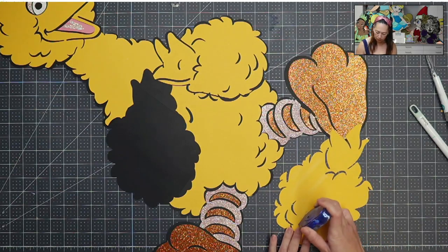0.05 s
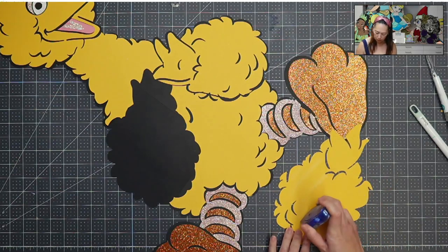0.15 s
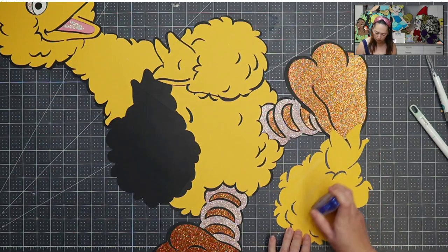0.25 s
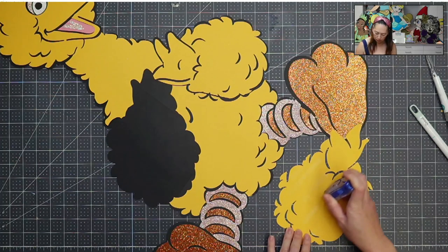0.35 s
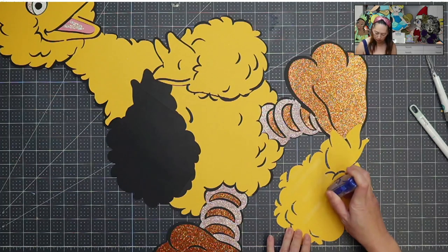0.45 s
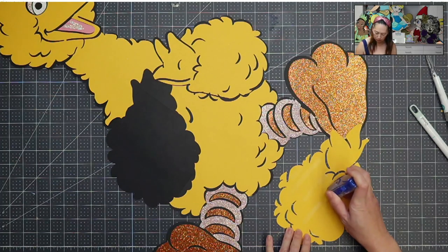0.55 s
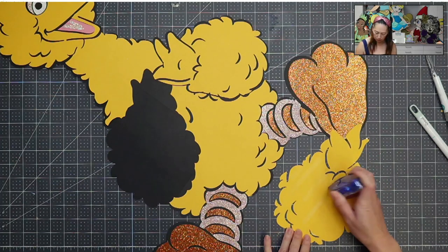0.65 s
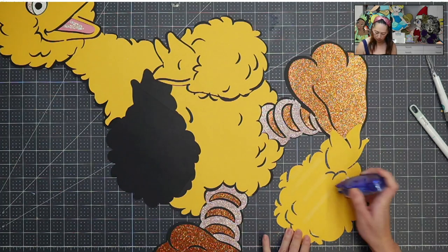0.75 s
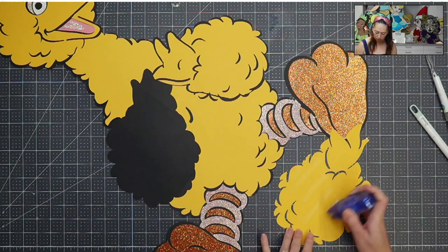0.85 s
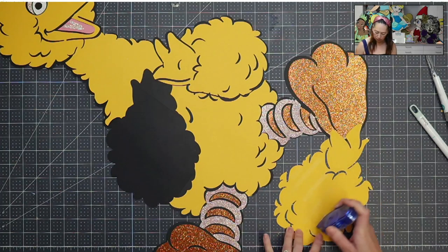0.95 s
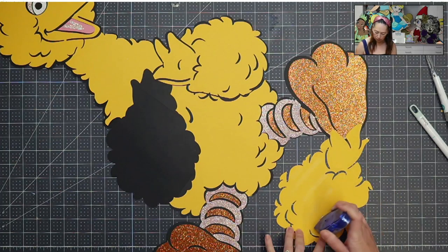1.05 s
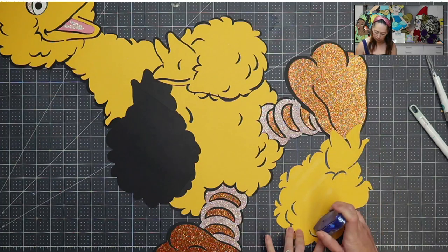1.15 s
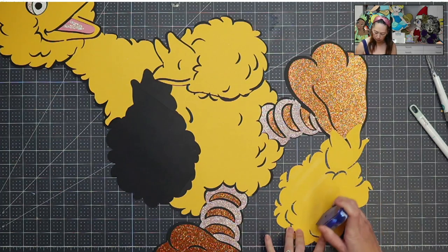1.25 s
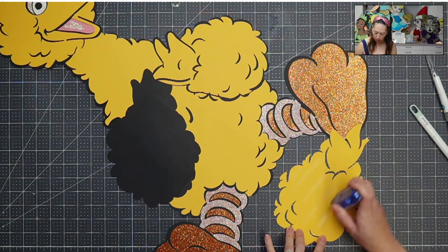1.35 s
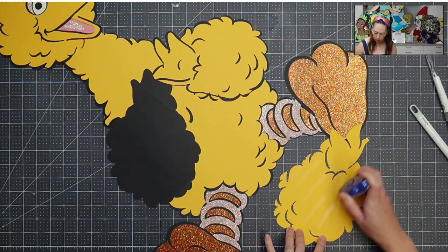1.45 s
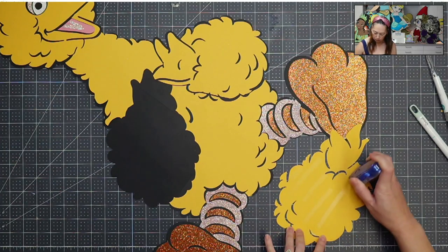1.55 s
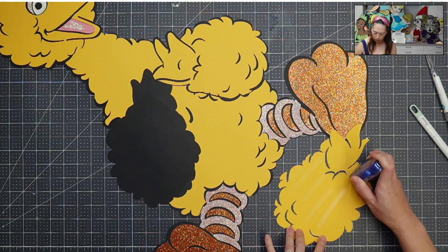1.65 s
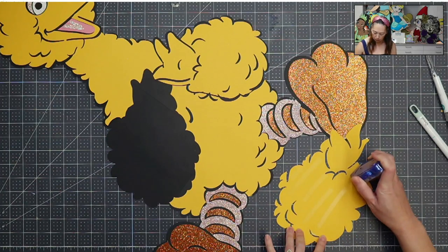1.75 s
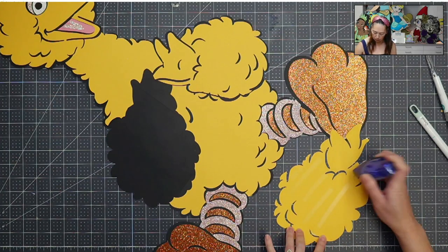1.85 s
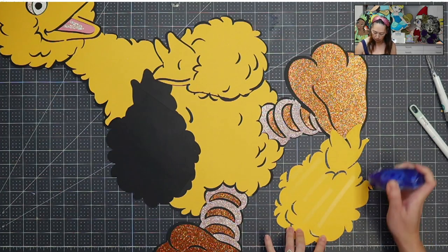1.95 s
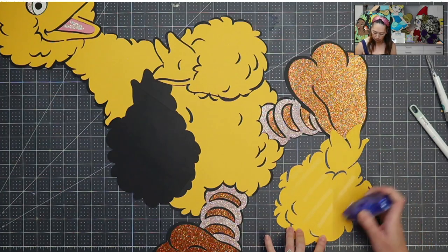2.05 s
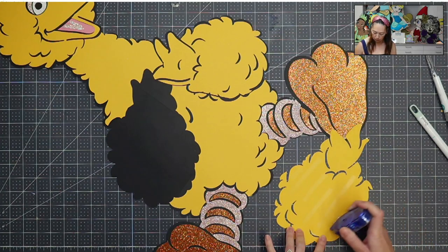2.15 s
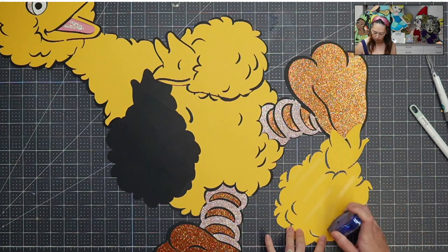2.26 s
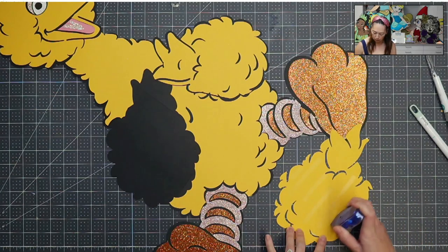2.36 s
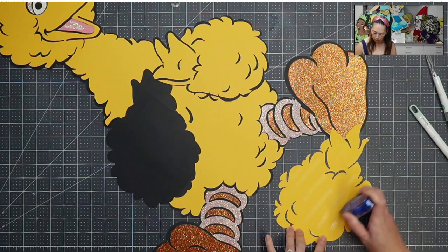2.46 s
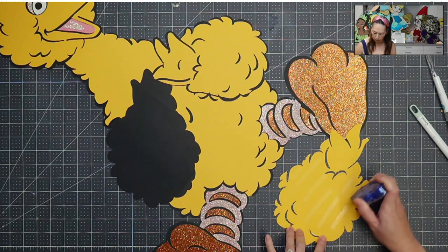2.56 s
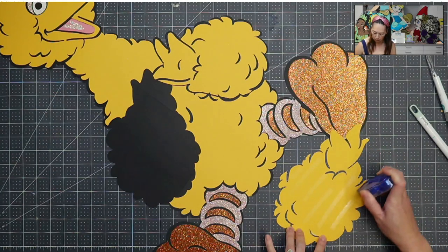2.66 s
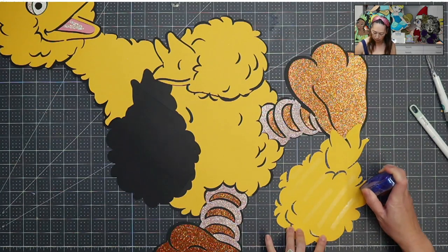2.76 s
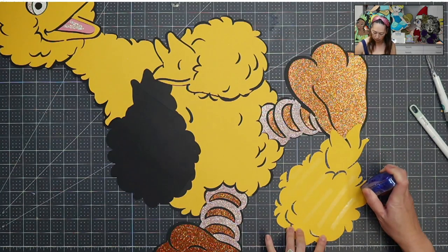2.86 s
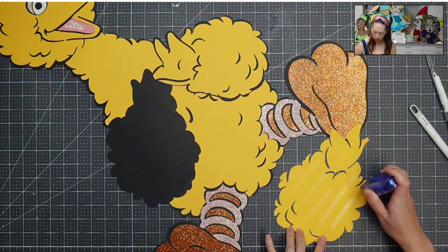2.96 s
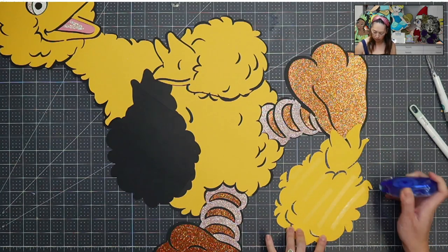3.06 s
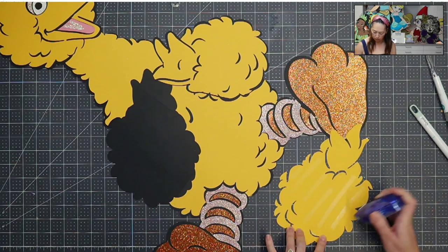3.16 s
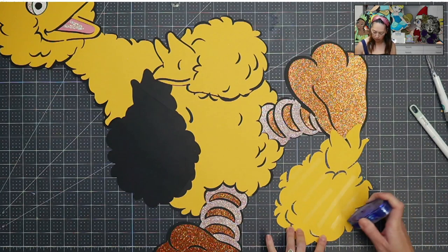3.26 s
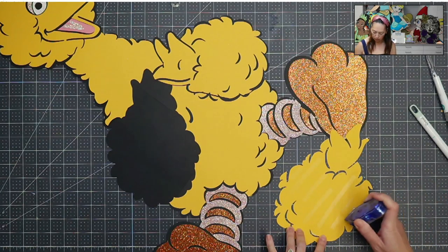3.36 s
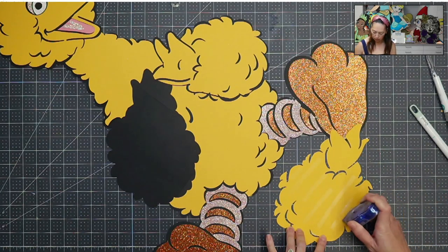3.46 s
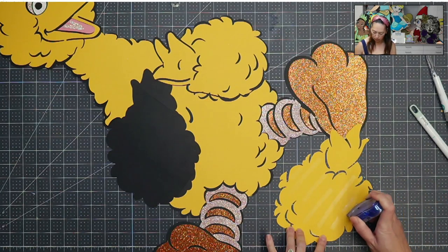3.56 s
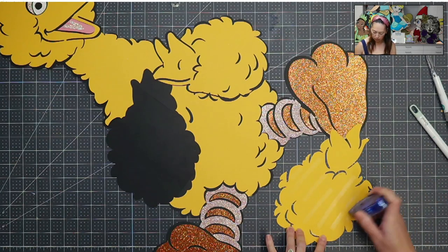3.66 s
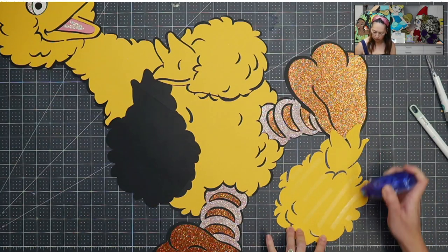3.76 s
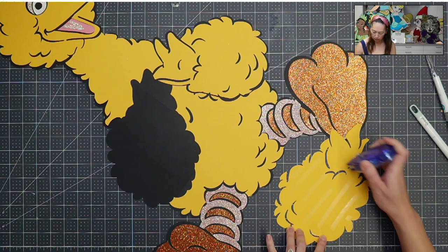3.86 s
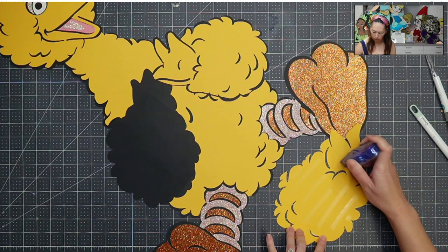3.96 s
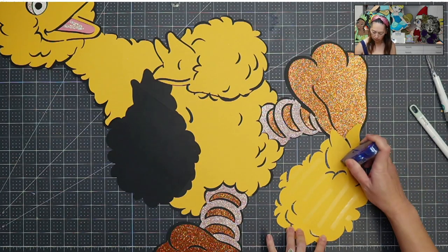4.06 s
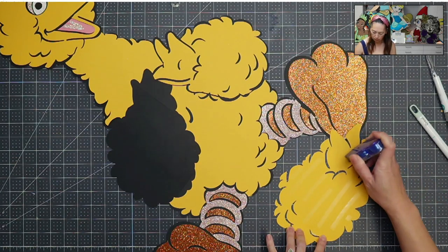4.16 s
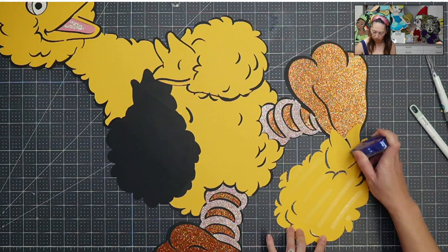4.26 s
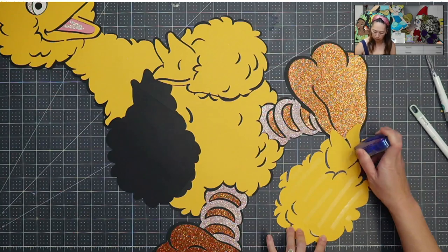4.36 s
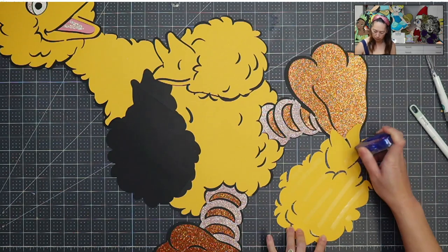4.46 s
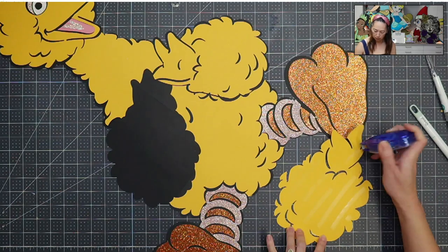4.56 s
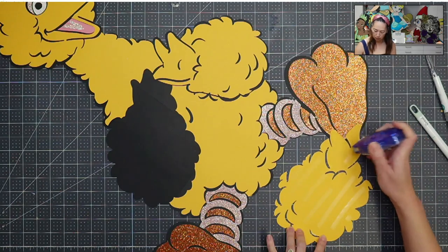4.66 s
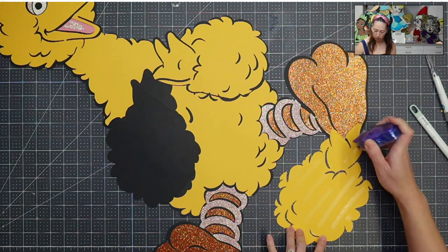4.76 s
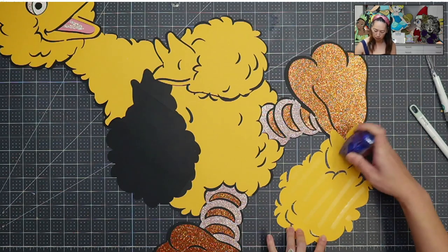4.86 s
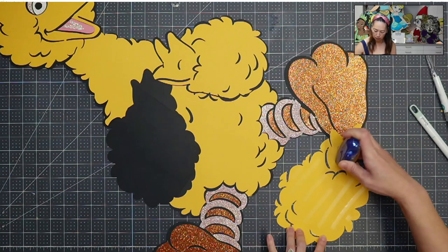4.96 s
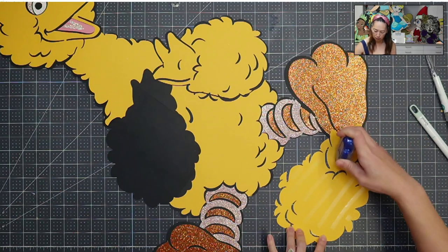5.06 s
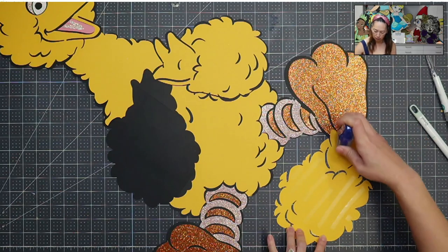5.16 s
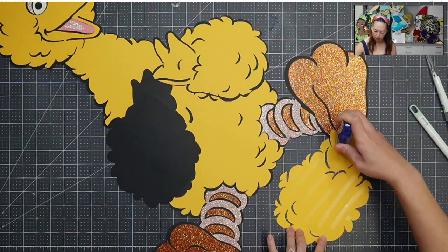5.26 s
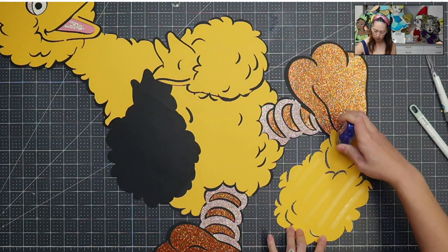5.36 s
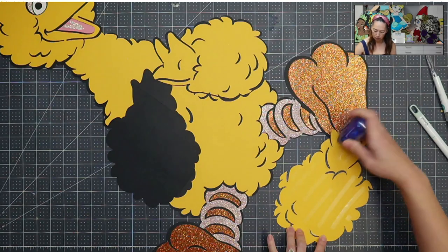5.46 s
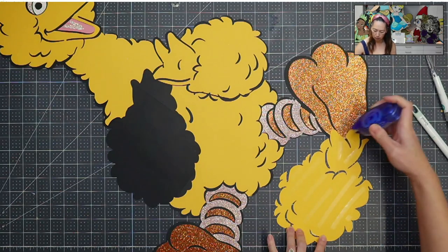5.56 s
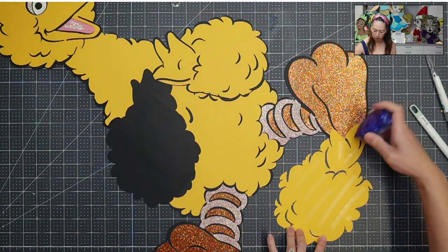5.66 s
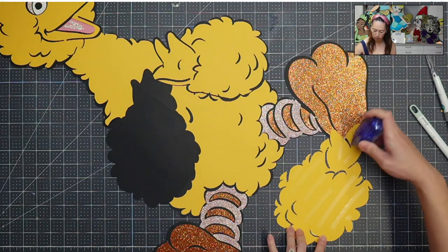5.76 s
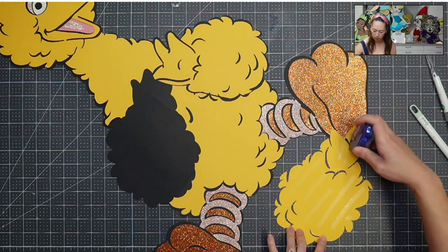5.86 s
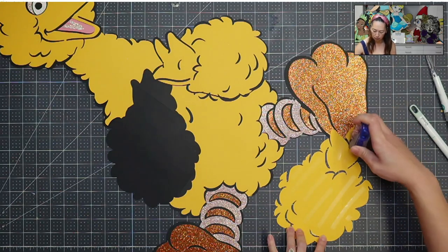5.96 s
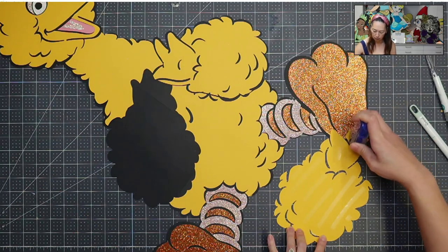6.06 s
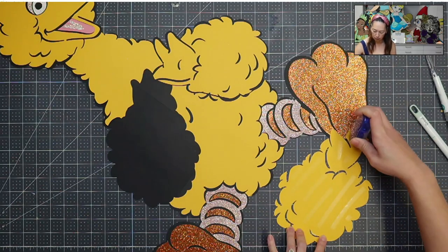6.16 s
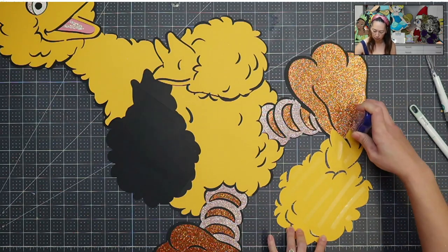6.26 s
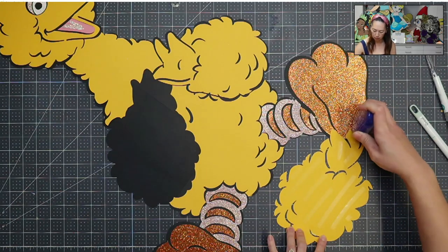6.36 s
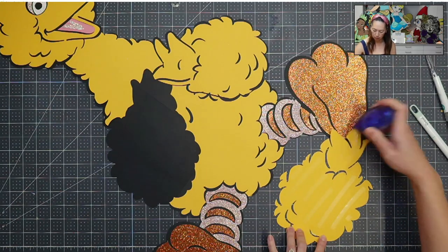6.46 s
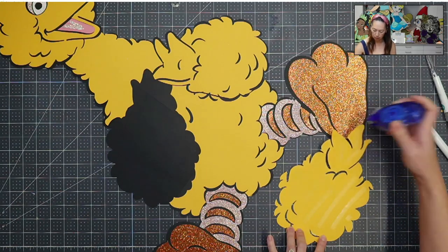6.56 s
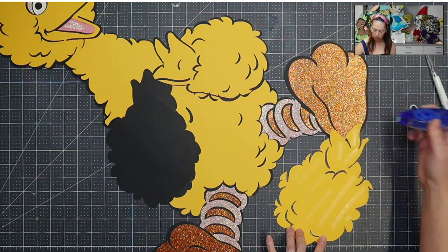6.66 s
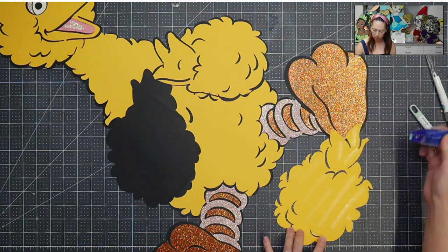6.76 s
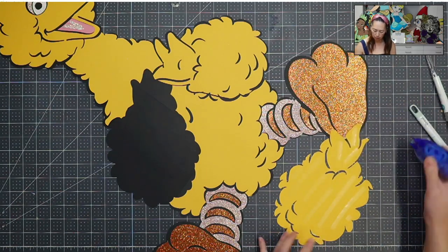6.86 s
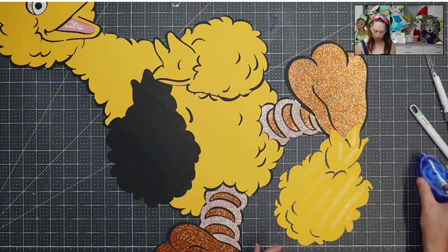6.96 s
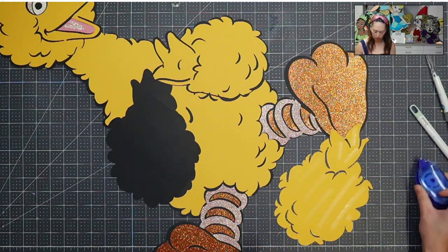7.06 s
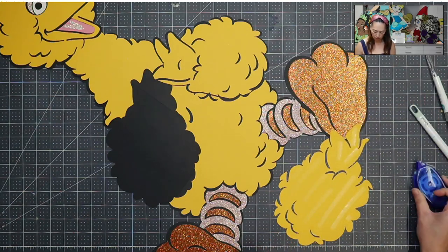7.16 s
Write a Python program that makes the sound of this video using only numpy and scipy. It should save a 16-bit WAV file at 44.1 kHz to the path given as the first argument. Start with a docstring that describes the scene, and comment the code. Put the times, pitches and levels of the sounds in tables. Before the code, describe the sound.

A plastic tape runner is drawn over cardstock in eight short strokes, close to the microphone. Its ratchet buzzes when pulled fast and separates into clicks as it slows. The first three strokes come at the very start, at 1 second and at 2.1 seconds, each about a third of a second long. Mostly shorter, clickier pulls follow at 3.3, 3.9, 4.9, 5.8 and 6 seconds. The tip lands with a soft thump and a plastic knock at about 0.9, 2, 3.2, 3.8 and 5.7 seconds. The tape catches with hard snaps near 1.2, 2.3 and 5 seconds, and small dry ticks of the case fall between strokes. From 6.8 to 7 seconds the runner is put down on the table with a few quick bumps, the last the loudest. A small room rings lightly behind it, over faint low rumble and thin hiss.

```python
"""Tape runner on a craft table

A plastic tape runner is drawn over cardstock in eight short strokes, close to the microphone.
Its spool ratchet clicks tooth by tooth: a buzz in fast strokes, single clicks in slow ones.
It lands with a soft thump and a knock before five of the strokes, ticks in the hand between them
and is laid aside at the end. A small room rings behind it, over low rumble and thin hiss."""
import sys
import numpy as np
from scipy import signal
from scipy.fft import rfft, irfft
from scipy.io import wavfile

SR = 44100
rng = np.random.default_rng(int(sys.argv[2]) if len(sys.argv) > 2 else 0)


def generate_wav(signal):
    """Clip the signal to [-1, 1] and save it as 16-bit WAV at the path in sys.argv[1]."""
    frames = np.transpose(np.atleast_2d(signal))
    scaled = np.clip(frames, -1, 1) * 32767
    pcm = np.round(scaled).astype(np.int16)
    wavfile.write(sys.argv[1], SR, pcm)


N = 318402
USUAL_TEETH_PER_S, USUAL_FORCE_DB = 100, -12  # an ordinary pull


def amp(db):
    """Decibels to gain."""
    return 10 ** (np.asarray(db) / 20)


def curve_at(points, hz):
    """A table's value at each frequency, joined on a log axis."""
    f, value = np.transpose(points)
    return np.interp(np.log(hz + 1), np.log(f + 1), value)


def resonance_db(modes, hz):
    """Level that a set of resonances adds at each frequency."""
    return sum(db / (1 + (2 * (hz - f) / width) ** 2) for f, width, db in modes)


def unit_energy(x):
    """Scales to an energy of one."""
    return x / np.sqrt(np.sum(x ** 2, axis=-1, keepdims=True) + 1e-20)


def add(mix, s, sound):
    """Adds a sound to the mix at time s."""
    part = mix[max(round(s * SR), 0):][:len(sound)]
    part += sound[:len(part)]


def minimum_phase(db):
    """Spectrum of a filter with this level that rings only after a blow."""
    cepstrum = irfft(np.log(amp(db)))
    half = cepstrum.shape[-1] // 2
    cepstrum[..., 1:half] *= 2
    cepstrum[..., half + 1:] = 0
    return np.exp(rfft(cepstrum))


def snaps(rows, colour, slide_db, rise_s, chatter_s, ring_db, ring_s, alike, size=2048):
    """Each snap is a short slide of plastic, a few milliseconds of chatter and a brief ring."""
    times, energy_db, body_db, treble_db = np.transpose(rows)
    lead_s, slide_s = 0.005, 0.0013
    t, hz = np.arange(size) / SR - lead_s, np.fft.rfftfreq(size, 1 / SR)
    noise = rng.standard_normal((len(times), size))
    grain = signal.lfilter([1], [1, -alike], noise, axis=0)  # each snap resembles the one before
    slide = amp(slide_db) * np.exp(-abs(t) / slide_s)
    after = np.maximum(t, 0)
    rise = 1 - np.exp(-(after / rise_s) ** 2)
    chatter = np.exp(-(after / chatter_s) ** 4)
    ring = amp(ring_db) * np.exp(-after / ring_s)
    contacts = np.sign(grain) * (slide + rise * (chatter + ring))  # tiny contacts of like strength
    # body and treble are weighted shelves: they tilt the colour and leave the energy alone
    low_shelf = body_db[:, None] * curve_at([(1900, 0.66), (2700, 0.082)], hz)
    high_shelf = treble_db[:, None] * curve_at([(5800, 0.058), (8500, 0.89)], hz)
    colour_db = np.array([colour(s, hz) for s in times]) + low_shelf + high_shelf
    sounds = unit_energy(irfft(rfft(contacts) * minimum_phase(colour_db)))
    out = np.zeros(N)
    for s, gain, sound in zip(times, amp(energy_db), sounds):
        add(out, s - lead_s, gain * sound)
    return out


# room tone and microphone hiss: (frequency [Hz], relative level [dB])
AIR_SPECTRUM = [(12, -47), (20, -9), (36, -8), (75, -4), (270, -16.5), (377, -16.5), (446, -21),
                (607, -19.5), (1060, -26), (1150, -24.5), (1480, -25.5), (2600, -28.5), (3160, -31.5),
                (3530, -30), (16000, -35)]
# narrow bands in that noise: (frequency [Hz], width [Hz], boost [dB])
AIR_PEAKS = [(104.5, 11.5, 4.5), (1580, 180, -0.5), (3190, 210, 12)]
# likeness of left and right at the microphone: (frequency [Hz], correlation [0-1])
AIR_CORRELATION = [(60, 0.98), (150, 0.94), (380, 0.86), (950, 0.74), (2380, 0.86), (5980, 0.61),
                   (15000, 1)]


def room_tone(level_db=-65):
    """Steady low room rumble under the microphone's thin hiss."""
    hz = np.fft.rfftfreq(N, 1 / SR)
    colour_db = curve_at(AIR_SPECTRUM, hz) + resonance_db(AIR_PEAKS, hz)
    mid, side = rfft(rng.standard_normal((2, N))) * amp(colour_db)
    likeness = curve_at(AIR_CORRELATION, hz)
    mid, side = mid * np.sqrt(1 + likeness), side * np.sqrt(1 - likeness)
    stereo = irfft(np.array([mid + side, mid - side]), N)
    return amp(level_db) * np.sqrt(N) * unit_energy(stereo)


# a click of the case, heard close up: (frequency [Hz], relative level [dB])
CASE_SPECTRUM = [(210, -62.5), (350, -29), (653, -25), (707, -18.5), (1380, -3), (1520, -5), (2350, -7.5),
                 (3280, -0.5), (4110, -7), (4670, -5), (5220, -7), (8170, -11.5), (10700, -16.5),
                 (14100, -11), (16000, -24)]
# resonances of the case in any grip: (frequency [Hz], width [Hz], boost [dB])
CASE_RESONANCES = [(3250, 400, 2), (3870, 150, 1.5), (4700, 220, 3), (6700, 400, 2), (8300, 400, 4),
                   (9900, 450, 3), (13000, 900, 4), (14700, 1100, 4)]
# the hand's grip for each stroke: (start [s], low resonance [Hz], its boost [dB],
# high resonance [Hz], its boost [dB], body [dB], treble [dB])
HAND_GRIPS = [(0, 1564, 6, 3330, 0.5, 0.5, 1.5), (0.8, 1585, 7.5, 3850, 2.5, -2.5, 2.1),
              (1.9, 1530, 5.5, 3920, 2.5, -2, 0.5), (3.1, 1960, 7.5, 4850, 6.5, 0, 3),
              (3.7, 1560, 6.5, 3160, 1.5, -5, -4), (4.7, 1580, 2, 5000, 3.5, -0.5, -1),
              (5.6, 1980, 5, 6900, 8, -1, -2), (5.95, 1950, 8, 3640, 3.5, 0, -1.5)]


def case_colour(s, hz, low_width_hz=250, high_width_hz=500):
    """Spectrum of the plastic case, retuned by the grip at time s."""
    grip_index = sum(s >= grip[0] for grip in HAND_GRIPS[1:])
    _, low_hz, low_db, high_hz, high_db, *_ = HAND_GRIPS[grip_index]
    held = [(low_hz, low_width_hz, low_db), (high_hz, high_width_hz, high_db)]
    return curve_at(CASE_SPECTRUM, hz) + resonance_db(CASE_RESONANCES + held, hz)


def tooth_clicks(stroke, grip, jitter_s=0.0002):
    """One row for snaps each time the spool turns by a tooth; speed, force and grip colour it."""
    s, speed, force_db = np.transpose(stroke)
    t = np.arange(s[0], s[-1], 1 / SR)
    teeth_turned = np.cumsum(np.interp(t, s, speed)) / SR
    times = np.interp(np.arange(round(teeth_turned[-1]) + 1), teeth_turned, t)
    push_db = np.interp(times, s, force_db)
    faster_octaves = np.log2(np.interp(times, s, speed) / USUAL_TEETH_PER_S)
    harder_db = push_db - USUAL_FORCE_DB
    lateness, strength = rng.standard_normal((2, len(times)))
    spread_db = 1 + 0.83 * faster_octaves  # the pawl drops less evenly from a faster wheel
    energy_db = push_db + 0.2 + spread_db * strength
    # a faster, harder pull shakes the case more, while the pawl's bright snap hardly grows
    *_, grip_body_db, grip_treble_db = grip
    body_db = grip_body_db + 2 * faster_octaves + 0.22 * harder_db
    treble_db = grip_treble_db - 1.24 * harder_db
    return np.column_stack([times + jitter_s * lateness, energy_db, body_db, treble_db])


# pulls across the card, one curve each: (time [s], spool speed [teeth/s], force on a tooth [dB])
PULLS = [
    [(0.0036, 125.5, -12.7), (0.0277, 185.9, -11.0), (0.104, 151.9, -12.0), (0.1228, 110.7, -6.8),
     (0.1565, 136.1, -13.0), (0.1874, 65.7, -13.1), (0.2191, 111.7, -12.4), (0.2612, 25.7, -13.4)],
    [(1.0316, 79.4, -13.0), (1.1085, 172.3, -10.5), (1.1231, 135.8, -9.5), (1.1564, 191.2, -9.4),
     (1.2372, 161.7, -10.2), (1.3165, 111.4, -9.9), (1.329, 74.5, -6.4), (1.3502, 93.0, -7.8),
     (1.401, 11.1, -15.2)],
    [(2.1485, 55.1, -13.4), (2.1867, 109.9, -14.1), (2.2794, 130.0, -11.1), (2.2875, 172.7, -10.7),
     (2.3725, 106.5, -9.3), (2.3839, 135.4, -10.5), (2.4151, 69.4, -12.8), (2.4433, 87.8, -11.5),
     (2.5029, 45.9, -13.5)],
    [(3.3063, 95.2, -10.8), (3.3202, 93.9, -10.7), (3.3508, 21.3, -10.6)],
    [(3.9233, 53.9, -11.9), (3.9517, 114.3, -10.1), (3.971, 48.4, -12.4), (4.0282, 29.6, -10.8),
     (4.0716, 78.6, -6.4), (4.0866, 54.3, -11.9), (4.1474, 26.8, -12.8), (4.211, 39.9, -13.0)],
    [(4.8817, 37.0, -14.7), (4.9146, 108.8, -12.9), (4.9452, 104.7, -13.8), (4.9993, 114.5, -10.4),
     (5.0302, 52.2, -9.8)],
    [(5.8077, 53.1, -12.8), (5.8306, 65.5, -10.8), (5.8445, 119.5, -11.6), (5.8776, 28.9, -13.0)],
    [(6.0171, 99.2, -5.7), (6.0355, 207.4, -9.9), (6.0451, 66.0, -12.0), (6.0639, 65.8, -14.2),
     (6.1055, 14.9, -16.4)],
]
# the spool slips one more tooth as the runner rests or lifts: (time [s], energy [dB])
SPOOL_SLIPS = [(0.4087, -15), (1.5427, -15), (2.5479, -13.5), (2.6368, -14.5), (2.6986, -15),
               (5.9742, -11.5)]


def ratchet(slip_body_db=-7.5, slip_treble_db=2.2):
    """The pawl rides up each tooth of the spool wheel and drops off it."""
    pulls = [tooth_clicks(stroke, grip) for stroke, grip in zip(PULLS, HAND_GRIPS)]
    slips = [(s, energy_db, slip_body_db, slip_treble_db) for s, energy_db in SPOOL_SLIPS]
    return sum(snaps(clicks, case_colour, slide_db=-13, rise_s=0.0005, chatter_s=0.0031,
                     ring_db=-8, ring_s=0.0035, alike=0.75) for clicks in pulls + [slips])


# the tabletop under the card: (frequency [Hz], relative level [dB], time to fall 60 dB [s])
TABLETOP_MODES = [(137, -1, 0.06), (191.4, 7, 0.051), (258, -15.5, 0.16), (306, -4.5, 0.056)]


def table_ring(t):
    """The tabletop's modes dying away after a push."""
    return sum(amp(db - 60 * t / t60) * np.sin(2 * np.pi * hz * t) for hz, db, t60 in TABLETOP_MODES)


def rolling(usual_db=-73.5, db_per_octave=9):
    """The tip rolls over the grain of the card; the tabletop rumbles more the faster it goes."""
    t = np.arange(N) / SR
    speed = sum(np.interp(t, *np.transpose(stroke)[:2], left=0, right=0) for stroke in PULLS)
    faster_octaves = np.log2(speed / USUAL_TEETH_PER_S + 1e-9)
    push = amp(usual_db + db_per_octave * faster_octaves) * rng.standard_normal(N)
    return signal.fftconvolve(push, unit_energy(table_ring(t[:SR // 4])))[:N]


# the small room around the table: (frequency [Hz], time to fall 60 dB [s])
ROOM_DECAY = [(200, 0.7), (700, 0.64), (1500, 0.44), (3500, 0.5167), (7000, 0.43), (14000, 0.29)]
# its tail at the microphone: (frequency [Hz], level against the direct sound [dB])
ROOM_LEVEL = [(200, -1.5), (700, -10), (1500, 0.5), (3300, -4), (7000, -8), (14000, -10.5)]


def room_tail(first_s=0.0012, build_s=0.0021, side_db=-36, size=256):
    """Dense reflections as mid and side, each band dying at its own speed."""
    noise = rng.standard_normal((2, SR)) / np.sqrt(SR) * amp([[0], [side_db]])
    hz, t, bands = signal.stft(noise, SR, nperseg=size)
    rate = np.log(1000) / curve_at(ROOM_DECAY, hz)[:, None]
    decay = np.exp(-rate * t) * np.sqrt(2 * rate)
    gain = amp(curve_at(ROOM_LEVEL, hz))[:, None]
    _, echoes = signal.istft(bands * decay * gain, SR, nperseg=size)
    since_first = np.maximum(np.arange(echoes.shape[1]) / SR - first_s, 0)
    return echoes * (1 - np.exp(-since_first / build_s))


def reflections(direct, drift_hz=3, paths=3):
    """The moving runner reaches the walls by ever-changing paths, so the tails take turns."""
    turn = np.pi * drift_hz * np.arange(N) / SR
    shares = [np.sqrt(2 / paths) * np.cos(turn + np.pi * k / paths) for k in range(paths)]
    mid, side = sum(signal.fftconvolve((direct * share)[None], room_tail(), axes=1)[:, :N]
                    for share in shares)
    return np.array([mid + side, mid - side])


def faint_ticks(per_stroke=2, wait_s=0.08, within_s=0.24, energy_db=-40.5, spread_db=3.5, bright_db=3):
    """Rows of barely heard ticks, at random as the hand moves back after each stroke."""
    ends = np.repeat([stroke[-1][0] for stroke in PULLS], per_stroke)
    return [(end + wait_s + within_s * rng.random(), rng.normal(energy_db, spread_db), bright_db)
            for end in ends]


# small dry ticks near the microphone: (time [s], energy [dB], brightness [dB])
HAND_TICKS = [(0.4758, -23, 11.5), (0.4826, -38, 10.5), (0.5153, -30, 2), (2.1381, -29.5, -17),
              (2.7669, -26, 3.5), (3.2979, -19, -10), (4.3593, -29.5, 4.5), (4.7666, -26, -11),
              (4.7973, -28.5, -20), (5.2818, -31, 2.5), (6.2215, -22, -12), (6.299, -21.5, -7.5),
              (6.313, -29, -11)]


def ticks():
    """Between strokes the case ticks in the hand and the tape snaps off the card."""
    rows = [(s, energy_db, -bright_db, bright_db)
            for s, energy_db, bright_db in list(HAND_TICKS) + faint_ticks()]
    return snaps(rows, case_colour, slide_db=-36, rise_s=0.00096, chatter_s=0.0025,
                 ring_db=4, ring_s=0.0054, alike=0.044)


# the tip lands on the card: (time [s], thump gain [dB], knock delay [s], knock energy [dB],
# knock body [dB], knock treble [dB])
TIP_LANDINGS = [(0.864, -45.5, 0.0076, -23, -13, 10), (2.017, -45.5, 0.0081, -21.5, 0, 9),
                (3.21, -42, 0.0046, -14.5, -4, 5), (3.821, -48, 0.0099, -19.5, -12, 4.5),
                (5.692, -48, 0.011, -21.5, -2, 0.5)]


def thumps(rise_s=0.004, scuff_delay_s=0.00199, scuff_db=15, body_db=3, treble_db=-12):
    """The rubbery tip gives the tabletop a soft push and scuffs the card."""
    t = np.arange(SR // 4) / SR
    scuffs = [(s + scuff_delay_s, gain_db + scuff_db, body_db, treble_db)
              for s, gain_db, *_ in TIP_LANDINGS]
    out = snaps(scuffs, case_colour, slide_db=0, rise_s=0.0017, chatter_s=0.0023,
                ring_db=-3, ring_s=0.0057, alike=0.099)
    thump = (1 - np.exp(-t / rise_s)) * table_ring(t)
    for s, gain_db, *_ in TIP_LANDINGS:
        add(out, s, amp(gain_db) * thump)
    return out


# peaks and dips of the shell, jolted through the tip: (frequency [Hz], width [Hz], boost [dB])
SHELL_RESONANCES = [(1120, 780, 2.5), (1600, 550, -12), (3020, 560, 4.5), (4540, 2800, -12.5)]


def knocks(duller_db=16):
    """Loose parts knock on landing, and the whole shell rattles for a moment."""
    def shell_colour(s, hz):
        return case_colour(s, hz) + resonance_db(SHELL_RESONANCES, hz)

    rows = [(s + delay_s, *knock) for s, _, delay_s, *knock in TIP_LANDINGS]
    snap = snaps(rows, case_colour, slide_db=-18, rise_s=0.0011, chatter_s=0.0024,
                 ring_db=-9, ring_s=0.0016, alike=0.15)
    duller = [(s, energy_db, body_db, treble_db - duller_db) for s, energy_db, body_db, treble_db in rows]
    rattle = snaps(duller, shell_colour, slide_db=17, rise_s=0.00076, chatter_s=0.0037,
                   ring_db=10.5, ring_s=0.016, alike=0.34)
    return snap + rattle


# the tape catches in mid-stroke: (time [s], energy [dB])
TAPE_CATCHES = [(1.1708, -6), (1.3218, -17.5), (2.3440, -8.5), (2.351, -15), (5.0129, -12.5)]


def catches(body_db=-13, treble_db=-17):
    """The tape catches and lets go with a hard snap."""
    rows = [(s, energy_db, body_db, treble_db) for s, energy_db in TAPE_CATCHES]
    return snaps(rows, case_colour, slide_db=-21, rise_s=0.00035, chatter_s=0.0015,
                 ring_db=7, ring_s=0.004, alike=0.2)


# a soft tap at the table: (time [s], energy [dB], body [dB], treble [dB])
SOFT_TAPS = [(4.656, -37.5, -2, -2)]


def tap():
    """A dull tap with almost no treble, as of a finger on the mat."""
    def colour(s, hz):
        return curve_at([(400, -28), (700, 2), (1400, 2), (2000, -12), (8000, -35)], hz)

    return snaps(SOFT_TAPS, colour, slide_db=-15, rise_s=0.0013, chatter_s=0.0051,
                 ring_db=-8, ring_s=0.005, alike=0.2)


# tape on the tip, faint even close up: (time [s], length [s], pitch [Hz], peak level [dB])
TAPE_SQUEAKS = [(4.94, 0.05, 909, -50.5)]


def squeak():
    """A short tone that swells and fades as the tape sticks and slips."""
    out = np.zeros(N)
    for s, length_s, hz, peak_db in TAPE_SQUEAKS:
        t = np.arange(0, length_s, 1 / SR)
        swell = np.sin(np.pi * t / length_s) ** 2
        add(out, s, amp(peak_db) * swell * np.sin(2 * np.pi * hz * t))
    return out


# the case striking the tabletop: (frequency [Hz], relative level [dB])
BUMP_SPECTRUM = [(100, -33), (200, -14), (400, -25.5), (700, -9), (1000, -12), (1500, -1), (2000, -12),
                 (3800, -4.5), (5200, -16.5), (7500, -18), (16000, -38)]
# the runner is put down near the microphone: (time [s], energy [dB], body [dB], treble [dB])
TABLE_BUMPS = [(6.6316, -34.5, -6, -24), (6.8253, -15.5, 2, -5), (6.8441, -18, -5, 0.5),
               (6.9562, -19.5, -10, 2), (6.9721, -9.5, -2, -6)]


def bumps():
    """The case bumps the table as it is laid aside."""
    def colour(s, hz):
        return curve_at(BUMP_SPECTRUM, hz) + resonance_db([(1500, 50, 1.1), (7540, 500, 6.5)], hz)

    return snaps(TABLE_BUMPS, colour, slide_db=0, rise_s=0.00014, chatter_s=0.003,
                 ring_db=4, ring_s=0.0043, alike=0.26)


def scene():
    """The runner, close and straight ahead of the microphone, with the room behind it."""
    runner = ratchet() + rolling() + ticks() + thumps() + knocks()
    runner += catches() + tap() + squeak() + bumps()
    return runner + reflections(runner) + room_tone()


def record(dry, edge_hz=16000):
    """The recorder's band limit cuts the highest treble."""
    lowpass = signal.firwin(511, edge_hz, window=("kaiser", 9), fs=SR)
    return signal.oaconvolve(dry, lowpass[None], "same")


dry = scene()
out = record(dry)
generate_wav(out)
```